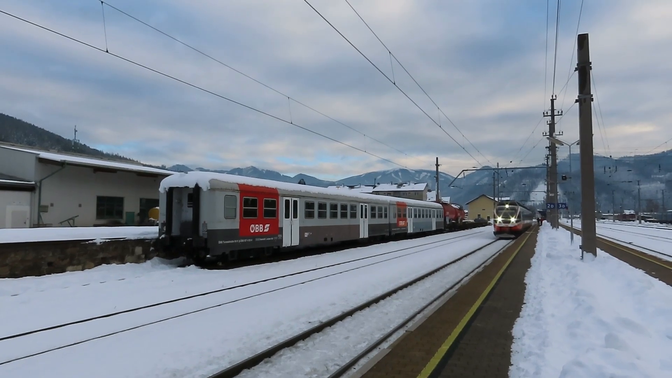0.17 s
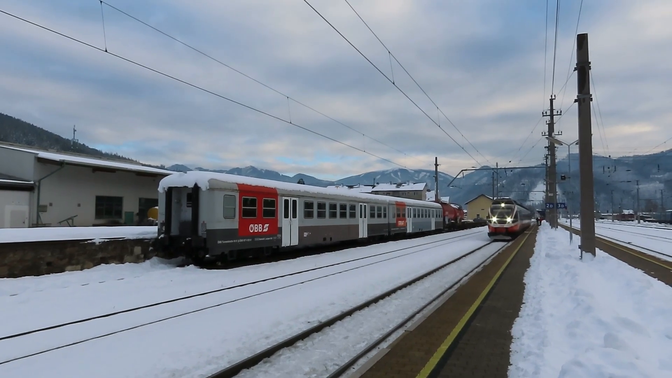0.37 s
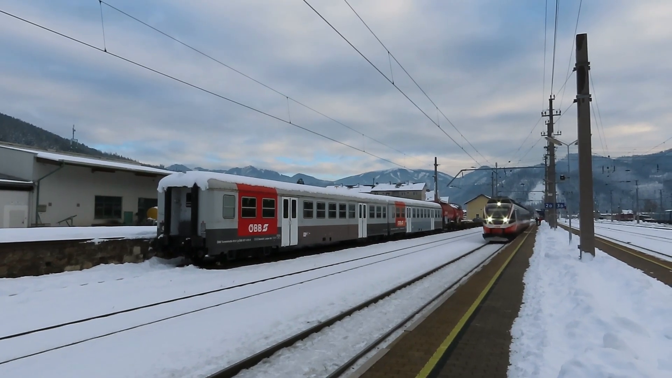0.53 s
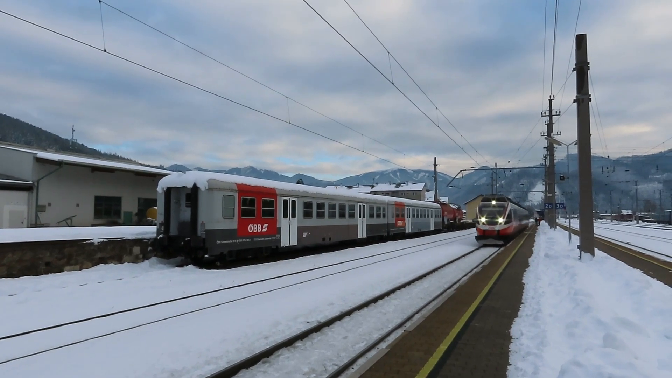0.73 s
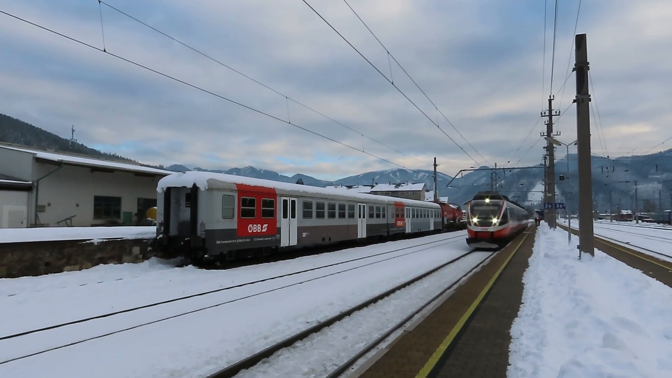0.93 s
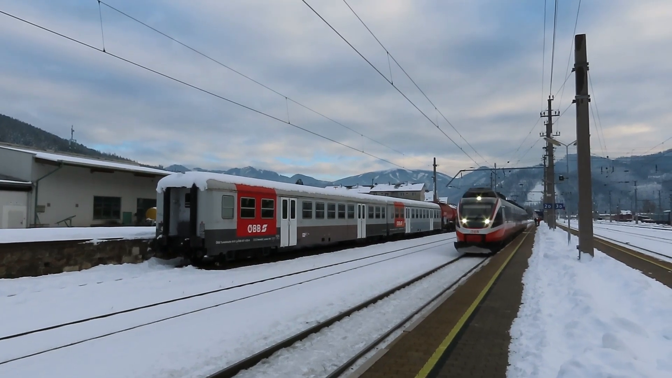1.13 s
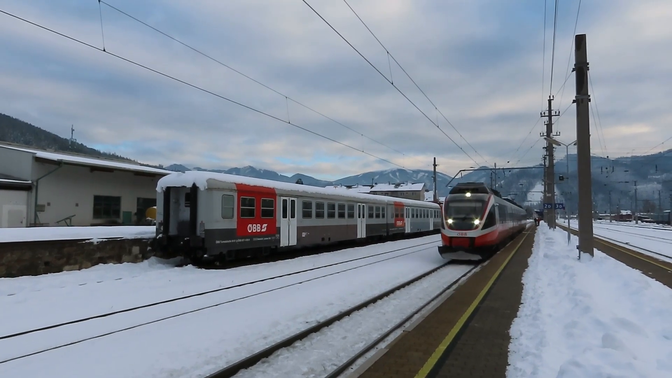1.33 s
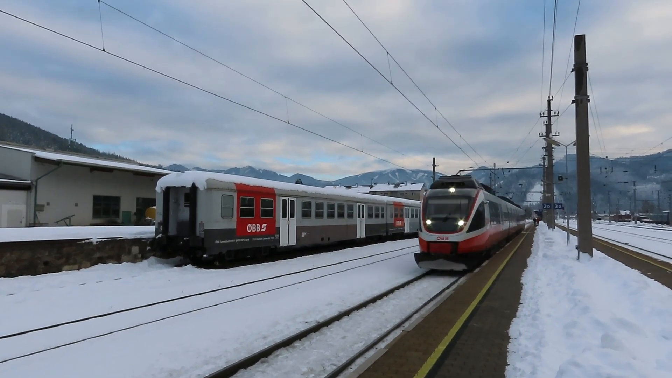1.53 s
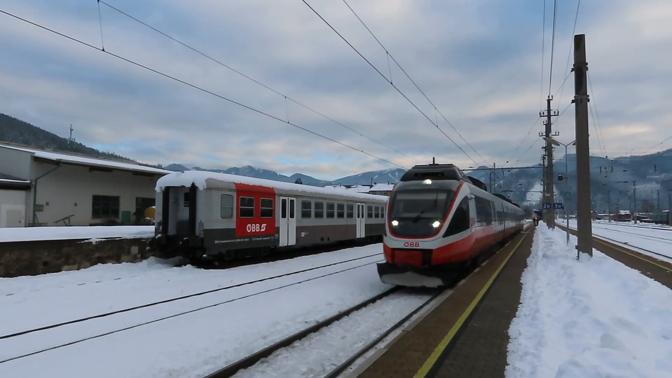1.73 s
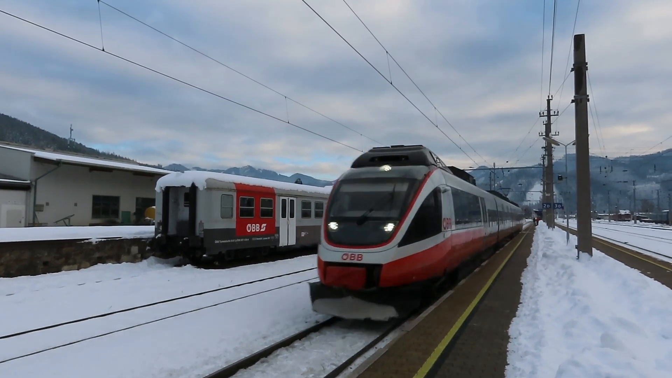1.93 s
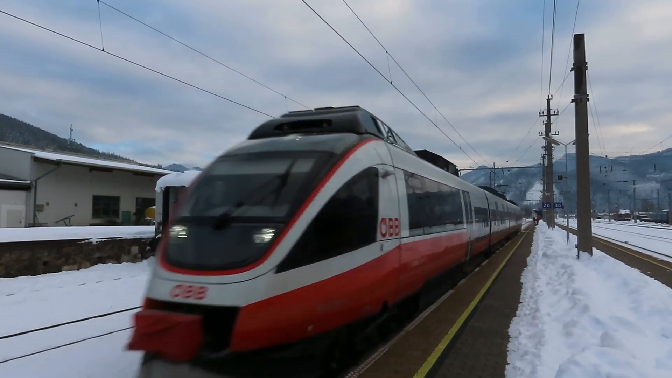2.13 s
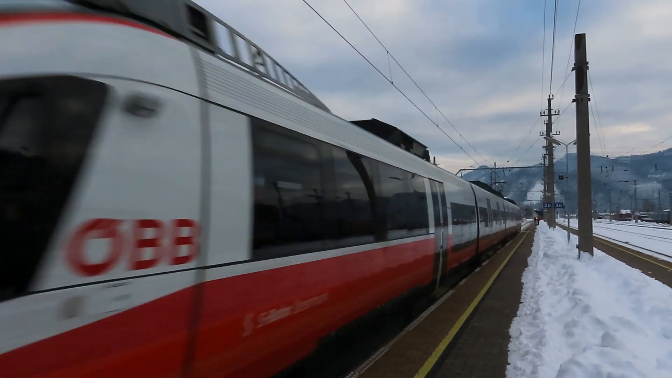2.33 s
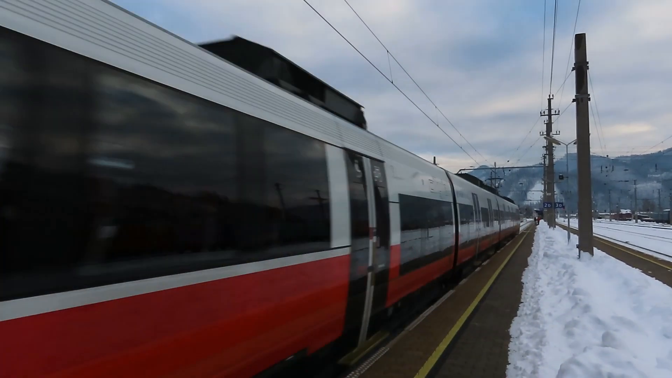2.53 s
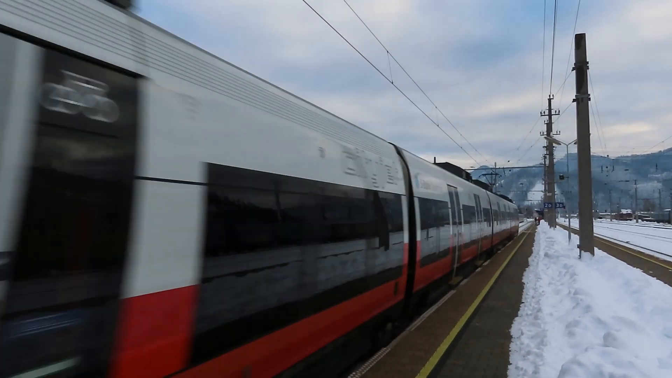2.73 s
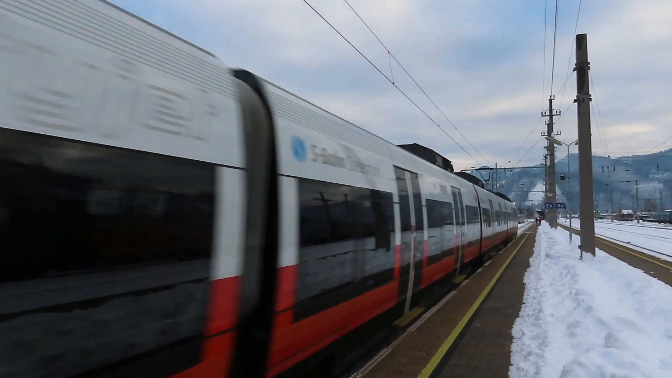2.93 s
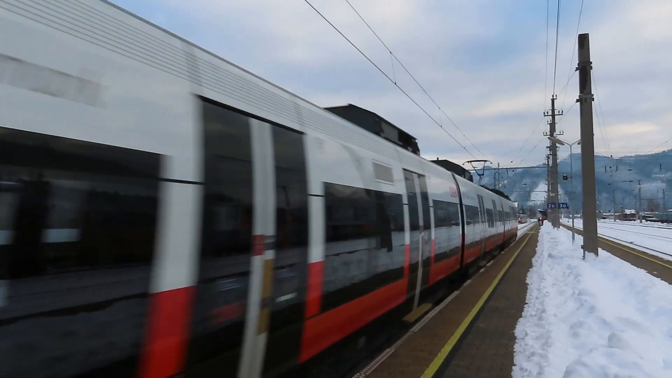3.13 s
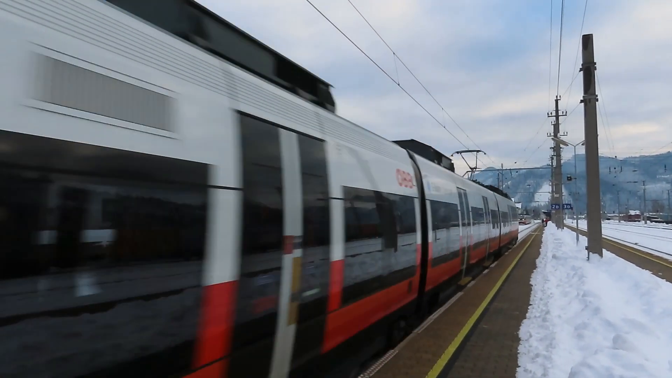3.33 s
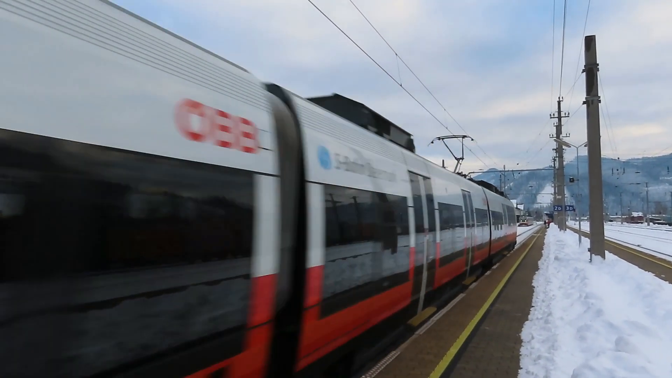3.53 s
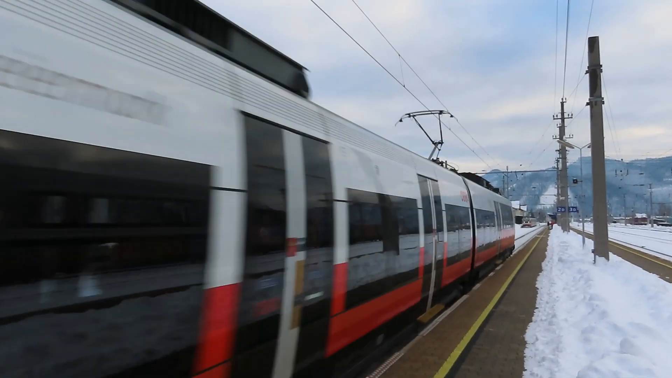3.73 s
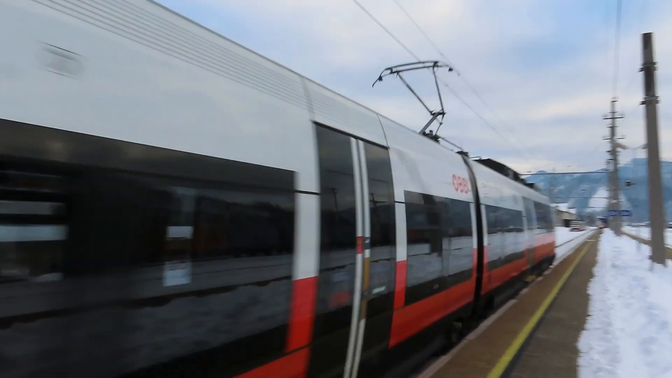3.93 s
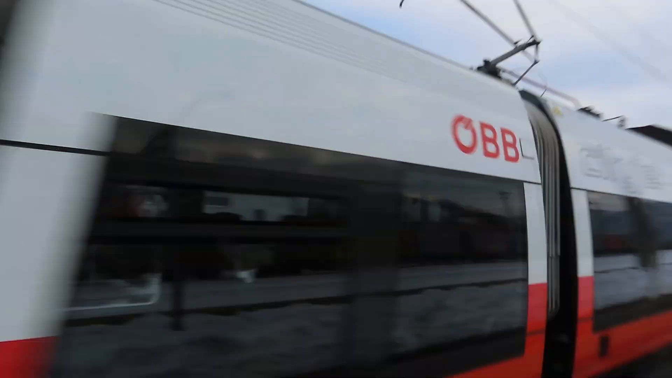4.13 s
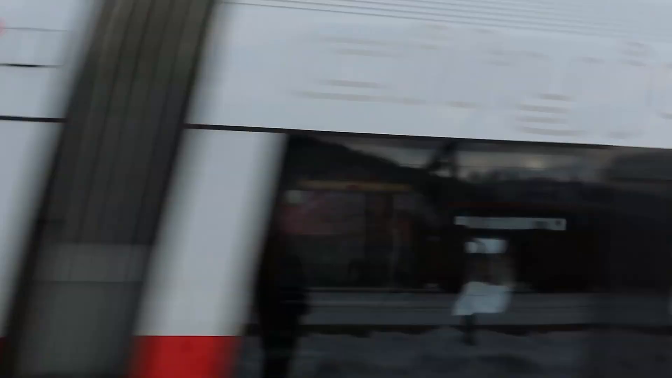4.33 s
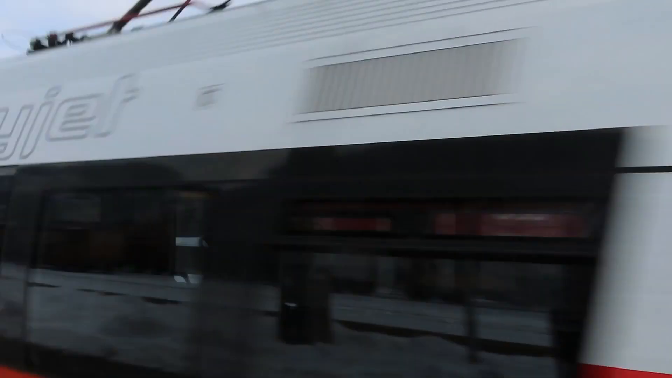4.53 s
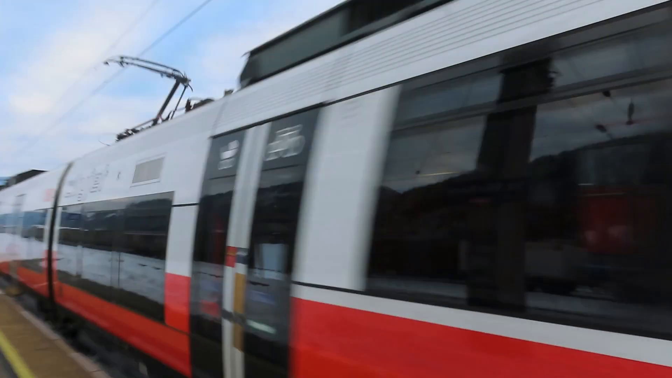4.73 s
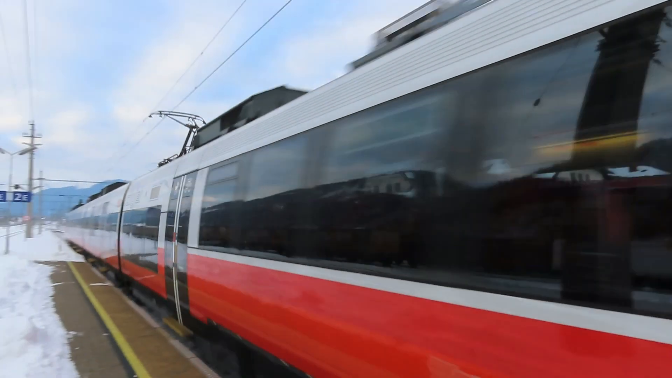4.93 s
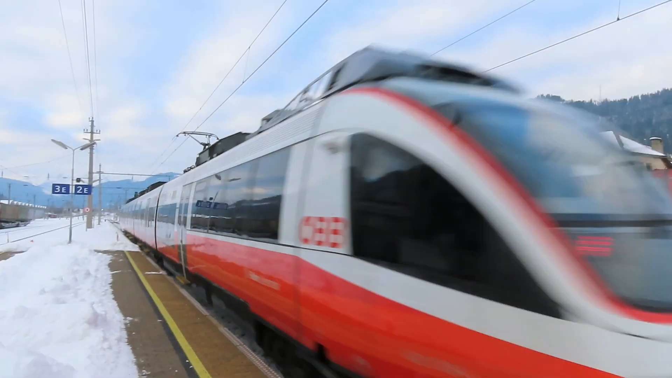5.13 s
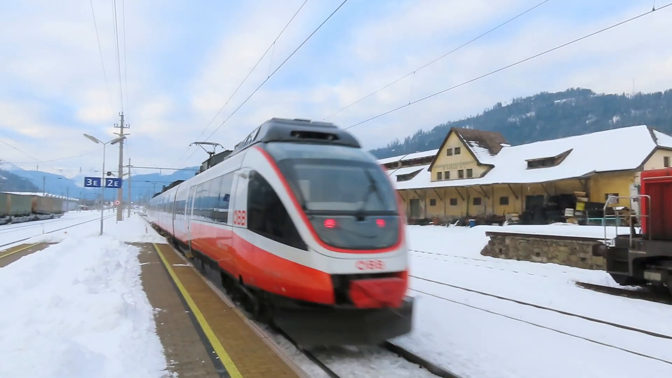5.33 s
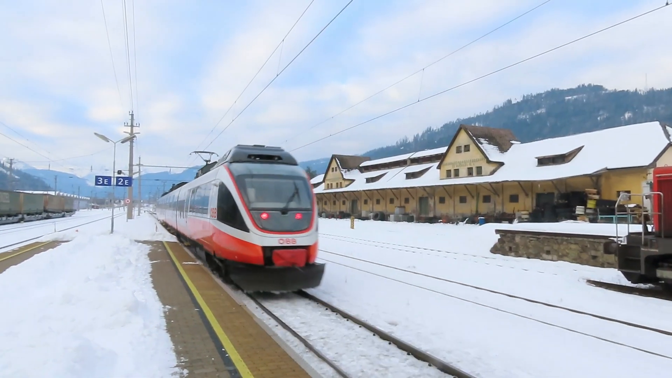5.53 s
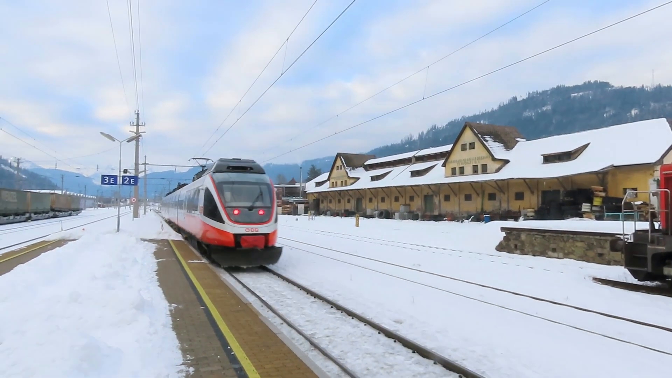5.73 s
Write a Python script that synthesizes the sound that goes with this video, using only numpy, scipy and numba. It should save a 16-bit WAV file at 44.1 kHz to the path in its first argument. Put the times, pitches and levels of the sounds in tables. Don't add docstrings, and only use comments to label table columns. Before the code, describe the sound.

Hand-held camera, outdoors, about a metre from the track: an electric train approaches with rolling rumble, mid-pitched whine and growing hiss. Its nose arrives with a sudden roar and low wind thump, the whine dropping in pitch. Several wheel sets pound by with hard metallic knocks and rail clank, dipping between groups, then the train recedes into fading rumble and a faint pure tone.

```python
import sys
import numpy as np
from scipy import signal
from scipy.fft import rfft, irfft
from scipy.io import wavfile
from scipy.ndimage import uniform_filter1d, map_coordinates
from numba import njit

SR = 44100
rng = np.random.default_rng(int(sys.argv[2]) if len(sys.argv) > 2 else 0)


def level_to_linear(level):
    exponent = np.asarray(level, float) / 20
    return 10 ** exponent


def persist_wave(psi):
    counts = np.round(np.clip(psi, -1, 1) * 32767).astype(np.int16)
    wavfile.write(sys.argv[1], SR, np.atleast_2d(counts).T)


N = 258867


def curves(table):
    s, *columns = np.transpose(table)
    return [np.interp(np.arange(N) / SR, s, c) for c in columns]


def colour(x, spectrum):
    hz, db = np.transpose(spectrum)
    log_hz = np.log(np.maximum(np.arange(N // 2 + 1) * SR / N, 1))
    return irfft(rfft(x) * level_to_linear(np.interp(log_hz, np.log(hz), db)), N)


def noise(spectrum):
    x = colour(rng.standard_normal(N), spectrum)
    return x / x.std()


def walk(rate):
    hold = int(SR / rate)
    steps = np.repeat(rng.standard_normal(N // hold + 1), hold)
    return 1.77 * uniform_filter1d(uniform_filter1d(steps, hold), hold)[:N]


def swell(s, rise_s, fall_s):
    t = np.arange(N) / SR - s
    return -4.3 * (t / np.where(t < 0, rise_s, fall_s)) ** 2


def together(*db):
    return np.sqrt(sum(level_to_linear(d) ** 2 for d in db))


@njit
def svf(x, hz, width):
    y, b, l = np.empty(len(x)), 0., 0.
    for i in range(len(x)):
        g, k = np.tan(np.pi * hz[i] / SR), width[i] / hz[i]
        v = (b + g * (x[i] - l)) / (1 + g * (g + k))
        b, l, y[i] = 2 * v - b, l + 2 * g * v, k * v
    return y


def delayed(x, seconds):
    return map_coordinates(x, [np.arange(N) - seconds * SR], order=5, mode="nearest")


def ports(x, lead, shade):
    left = delayed(x, -lead / 2) * (1 + shade * lead)
    right = delayed(x, lead / 2) * (1 - shade * lead)
    return np.array([left, right])


# t/s, end (0 nose, 1 flank, 2 tail)
FACING = [(0, 0), (2.52, 0), (2.68, 1), (4.8, 1), (5.05, 2), (5.87, 2)]


def by_end(values):
    return np.interp(curves(FACING)[0], np.arange(3), values)


def turning(spectra):
    facing = curves(FACING)[0]
    shares = [np.sqrt(np.clip(1 - np.abs(facing - k), 0, 1)) for k in range(3)]
    return sum(share * noise(s) for share, s in zip(shares, spectra))


# t/s, level/dB
NOSE = [(0, -15), (.6, -13), (1.0, -10), (1.25, -7.5), (1.7, -6), (2.1, -2.5), (2.28, 0), (2.38, 0),
        (2.45, -2), (2.53, 0.5), (2.62, -1.5), (2.72, -6), (2.9, -16.5), (3.3, -31), (5.87, -43)]
# t/s, level/dB, treble loss/dB, half width/s, frame pitch f/Hz
BOGIES = [(3.04, -3.5, 1.2, 0.13, 348), (3.22, 0, -3.2, 0.11, 490), (3.792, -2, -2.5, 0.11, 398),
          (3.96, -4.5, -3, .08, 335), (4.31, -4.5, -3, 0.11, 341), (4.53, -5.5, -1.5, 0.15, 370),
          (4.76, -11, -4, .08, 300)]
PARTS = {"frame": (-14, 1.18, -13.5, 0, -28.5), "ground": (-19.5, 1.27, -40, .5, -39),
         "rail": (-18, 1.0, -27, 0.42, -34.5), "wheel": (-21, 1.0, -31, 2, -38),
         "spray": (-38, 0.98, -47.5, 1.75, -50.5), "hiss": (-69, 0.5, -63, 1, -70)}
TAIL_FADE = {"frame": 7.5, "ground": -1.5, "rail": 7, "wheel": 11.5, "spray": 8, "hiss": 0}


def passing(part):
    nose_db, swing, flank_db, share, tail_db = PARTS[part]
    t = np.arange(N) / SR
    bogies = []
    for s, db, loss_db, half, _ in BOGIES:
        spread_db = 20 * np.log10(1 + ((t - s) / (1.83 * half)) ** 2)
        bogies.append(flank_db + db + share * loss_db - spread_db)
    tail_s, rise_s, hold_s = 5.05, .14, .12
    tail = tail_db + swell(tail_s, rise_s, np.inf)
    tail = tail - TAIL_FADE[part] * np.maximum(t - tail_s - hold_s, 0)
    return together(nose_db + swing * curves(NOSE)[0], tail, *bogies)


# t/s, level/dB
JET = [(0, -94), (.7, -74), (.92, -65), (1.02, -57), (1.09, -51), (1.75, -48.5), (2.1, -45), (2.27, -36.5),
       (2.4, -38.5), (2.46, -37), (2.52, -32), (2.6, -38), (2.7, -44), (2.8, -47.5), (2.92, -59),
       (3.3, -87), (5.87, -95.5)]


def with_jet(db, swing):
    jet_db = curves(JET)[0]
    return db + swing * (jet_db + 45.5) + np.minimum(jet_db + 58, 0)


# f/Hz, level/dB
GROUND = [
    [(12, -27), (30, -9.5), (54, 2), (85, -6.5), (115, -3.5), (150, -4), (250, -68.5)],
    [(15, -51), (25, -28), (54, -13.5), (85, -11.5), (115, -3), (150, -5), (250, -74)],
    [(15, -46), (25, -17), (54, -8), (85, -6.5), (130, 2), (170, -14), (250, -65.5)],
]
# f/Hz, level/dB
BOGIE = [(40, -51), (75, -15.5), (112, -3.5), (185, -1), (220, 2.5), (360, -0.5), (525, 0), (650, -8),
         (900, -37), (1400, -68)]
BOGIE_NOSE = [(40, -60), (75, -33), (112, -24), (170, -3.5), (240, -0.5), (380, -3.5), (525, -4), (650, -4),
              (900, -30.5), (1400, -60)]
# f/Hz, level/dB
RAIL = [(400, -53), (600, 0), (740, -0.5), (860, -4.5), (950, -4.5), (1100, -6.5), (1300, -19.5),
        (1800, -68)]
RAIL_NOSE = [(400, -36.5), (600, -5), (740, -4.5), (800, -0.5), (900, -0.5), (950, -6.5), (1100, -12.5),
             (1300, -38), (1800, -64.5)]
# f/Hz, level/dB
WHEEL = [
    [(700, -40), (1100, 1), (1400, -1), (1800, -1.5), (2200, -10), (2800, -6.5), (3200, -17), (4500, -55.5)],
    [(700, -34.5), (1100, -1.5), (1400, -3.5), (1800, -5), (2200, -12), (2800, -16), (3200, -40.5), (4500, -60)],
    [(700, -52), (1100, 2), (1600, 3.5), (1950, -8), (2320, -4), (2750, -14), (3200, -30), (4500, -59)],
]
# f/Hz, level/dB
SPRAY = [
    [(2000, -45), (2900, -3.5), (3800, -0.5), (4500, -3), (5200, -5.5), (6300, -14.5), (7500, -11.5), (9000, -48.5)],
    [(2000, -53.5), (2900, -1.5), (3800, -1.5), (4500, -5), (5200, -7.5), (6300, -13.5), (7500, -17.5), (9000, -43.5)],
    [(2000, -44), (2900, 3), (3800, 0), (4400, -4.5), (5200, -12), (6300, -13), (7500, -19.5), (9000, -48)],
]
# f/Hz, level/dB
HISS = [
    [(4500, -20), (6300, -1), (8000, 0.5), (10500, 0), (12500, -2.5), (14000, -4), (15600, -8.5), (15900, -52.5)],
    [(4500, -46), (6300, -4), (8000, -0.5), (10500, -7), (12500, -12), (14000, -14), (15000, -22), (15900, -65)],
    [(4500, -45), (6300, -6), (8000, -1), (10000, -3), (11500, -12), (13000, -12), (15000, -29), (15900, -62)],
]
# t/s, level/dB, length/s
JOINTS = [(0.65, -39, 0.042), (1.01, -32.5, 0.04), (1.765, -24.5, 0.1), (3.08, -26.5, .07),
          (3.608, -32.5, 0.086), (4.804, -32.5, .07), (5.38, -41.5, 0.04), (5.782, -35.5, .08)]
# t/s, dip/dB, half length/s
LULLS = [(3.085, -6, .012), (3.27, -2, .015), (3.81, -3, .01), (3.895, -4, .012), (4.0, -4, .02),
         (4.17, -1.5, .012), (4.235, -3, .012), (4.268, -5, .01), (4.33, -5, .012), (4.365, -3, .008),
         (4.512, -5, .012), (4.655, -3, .015), (4.835, -3, .01)]
# t/s, level/dB, rise/s, fall/s
SURGE = (2.58, -37.5, .08, .045)


def train():
    tremble = walk(11)
    thumps = together(*[db + swell(s, length, length) for s, db, length in JOINTS])
    ground = level_to_linear(.89 * walk(8.6)) * np.hypot(passing("ground"), thumps) * turning(GROUND)
    frame_hz, ends_hz = 312, 398
    bogie_hz = by_end((ends_hz, frame_hz, ends_hz))
    bogie_hz = bogie_hz + sum((hz - frame_hz) * level_to_linear(swell(s, half, half / 2)) for s, _, _, half, hz in BOGIES)
    frame = turning((BOGIE_NOSE, BOGIE, BOGIE))
    frame = frame + .96 * svf(frame, bogie_hz, bogie_hz * .54)
    lulls_db = sum(db * level_to_linear(swell(s, half, half)) for s, db, half in LULLS)
    frame = level_to_linear(-4.5 + .55 * tremble + lulls_db) * passing("frame") * frame
    rail = level_to_linear(.86 * tremble) * passing("rail") * turning((RAIL_NOSE, RAIL, RAIL))
    wheel = level_to_linear(.64 * tremble) * passing("wheel") * turning(WHEEL)
    surge_s, surge_db, rise, fall = SURGE
    blown = together(with_jet(-47, .39), surge_db + swell(surge_s, rise, fall))
    spray = level_to_linear(.5 * tremble) * np.hypot(passing("spray"), blown) * turning(SPRAY)
    hiss_gain = np.hypot(passing("hiss"), level_to_linear(curves(JET)[0]))
    hiss = level_to_linear(by_end((.5, 3, 1.5)) * walk(14)) * hiss_gain * turning(HISS)
    return ground + frame + rail, wheel + spray + hiss


# t/s, extra path/ms, share 0-1
MIRROR = [(0, .51, .4), (1.1, .508, .5), (2.0, .508, .42), (2.3, .53, .25), (2.5, .7, .1), (4.9, .6, .1),
          (5.1, .39, .2), (5.4, .44, .15), (5.87, .44, .15)]


def mirrored(high):
    path_ms, share = curves(MIRROR)
    share = np.clip(share, 0, .9)
    return (high + share * delayed(high, path_ms / 1000)) / np.sqrt(1 + share ** 2)


# f/Hz, level/dB
SCATTER = [(60, -65.5), (250, -40.5), (500, -23), (1000, -15.5), (2000, -11), (4000, -9), (7000, -5),
           (10000, 0.5), (15000, 5)]
SCATTER_DB = (-10.5, -8, -8.5)


def scatter():
    return level_to_linear(by_end(SCATTER_DB) + 3.5) * colour(sum(train()), SCATTER)


# f/Hz, level/dB
SIZZLE = [(9000, -40), (10800, -9), (11700, -7), (12200, -1), (12800, 0), (13500, -3), (14000, -10),
          (15000, -8), (15600, -9), (15900, -50)]


def sizzle():
    steady_db = by_end((-62, -80.5, -82)) + .6 * np.clip(curves(NOSE)[0] + 13, -3, 3)
    return together(steady_db, with_jet(-55.5, .15)) * noise(SIZZLE)


def whine():
    t = np.arange(N) / SR
    pass_s = 2.52
    ahead = pass_s - t
    hz = 798 * (1 + .05 * np.tanh(ahead / .06)) + 13 * ahead
    db = -33 + 1.1 * curves(NOSE)[0] + 2 * walk(7)
    db = db - 3.5 * level_to_linear(swell(1.52, .15, .15))
    db = db - 18.5 * level_to_linear(swell(pass_s, .03, .044))
    db = db - 60 * np.maximum(-ahead - .1, 0)
    blur_hz = 11 + 35 * np.clip(ahead - .4, 0, 1.3)
    band = svf(rng.standard_normal(N), hz, blur_hz) * np.sqrt(SR / np.pi / blur_hz)
    tail_s = 5.36
    tail_hz = 733 + 64 * (t - tail_s)
    tone_db = -35.5 + swell(tail_s + .13, .12, np.inf)
    tone = np.sin(2 * np.pi * np.cumsum(tail_hz + .6 * walk(15)) / SR)
    return level_to_linear(db) * band + np.sqrt(2) * level_to_linear(tone_db + walk(22)) * tone


# f/Hz, level/dB
RUSTLE = [(20, -30), (80, -12), (200, -5.5), (400, 3), (700, -5.5), (1500, -47.5)]


def breeze():
    return level_to_linear(-52 + swell(2.15, np.inf, .06) + 3.4 * walk(9)) * noise(RUSTLE)


def thin_tones(table, wobble):
    t = np.arange(N) / SR
    out = np.zeros(N)
    for s, hz, db, length in table:
        gain = level_to_linear(db + swell(s, length, length) + 2 * walk(30))
        out += gain * np.sin(2 * np.pi * hz * t + wobble * walk(40))
    return out


# t/s, f/Hz, level/dB, length/s
FLARES = [(.4, 885, -35, .05), (.92, 840, -33, .03), (1.27, 845, -31, .06), (1.62, 905, -31, .05),
          (1.92, 790, -29, .04), (1.98, 865, -30, .04), (2.24, 841, -21.5, .06), (2.27, 785, -24, .025),
          (2.415, 855, -22, .025), (2.61, 762, -19.5, .03), (5.14, 756, -36, .04)]


def flares():
    return thin_tones(FLARES, .24)


# t/s, f/Hz, level/dB, half length/s
RINGS = [(2.209, 322, -19.0, 0.008), (2.295, 258, -16.0, 0.008), (2.317, 419, -17.0, 0.008),
         (2.358, 355, -18.0, 0.012), (2.426, 183, -15.0, 0.008), (2.508, 430, -18.0, 0.013),
         (2.517, 538, -18.0, 0.01), (2.971, 247, -18.0, 0.01), (3.039, 269, -16.0, 0.015),
         (3.066, 419, -15.0, 0.008), (3.07, 549, -17.0, 0.008), (3.098, 161, -19.0, 0.01),
         (3.125, 344, -18.0, 0.01), (3.134, 516, -15.0, 0.027), (3.136, 204, -19.0, 0.008),
         (3.175, 559, -14.0, 0.016), (3.184, 355, -13.0, 0.011), (3.202, 592, -15.0, 0.021),
         (3.22, 495, -11.0, 0.008), (3.227, 290, -19.0, 0.008), (3.24, 226, -18.0, 0.019),
         (3.317, 473, -18.0, 0.008), (3.331, 215, -15.0, 0.012), (3.764, 355, -14.0, 0.008),
         (3.78, 495, -16.0, 0.013), (3.787, 409, -12.0, 0.008), (3.828, 462, -16.0, 0.008),
         (3.853, 333, -16.0, 0.01), (3.878, 484, -18.0, 0.011), (3.916, 409, -19.0, 0.016),
         (3.934, 193, -19.0, 0.021), (3.959, 290, -16.0, 0.016), (4.032, 322, -19.0, 0.021),
         (4.059, 269, -19.0, 0.015), (4.206, 387, -16.0, 0.008), (4.209, 301, -15.0, 0.008),
         (4.252, 366, -18.0, 0.019), (4.283, 538, -19.0, 0.008), (4.299, 301, -15.0, 0.013),
         (4.299, 387, -18.0, 0.01), (4.311, 236, -17.0, 0.018), (4.345, 355, -19.0, 0.014),
         (4.379, 236, -17.0, 0.008), (4.392, 290, -17.0, 0.008), (4.392, 376, -17.0, 0.01),
         (4.456, 355, -18.0, 0.03), (4.472, 581, -18.0, 0.008), (4.535, 355, -16.0, 0.008)]


def rings():
    out = np.zeros(N)
    for (s, hz, db, half), turn in zip(RINGS, rng.random(len(RINGS))):
        i = np.arange(-4000, 4000) + int(s * SR)
        t = i / SR - s
        tone = np.sin(2 * np.pi * (hz * t * (1 - .3 * t) + turn))
        out[i] += level_to_linear(db + 1.5 - 4.3 * (t / half) ** 2) * tone
    return out


# t/s, level/dB, rise/s, fall/s
GUSTS = [
    (2.28, -27, 0.045, .05),
    (2.42, -17.5, 0.066, 0.036),
    (2.57, -25, .04, 0.02),
    (2.73, -46, .04, .03),
    (5.2, -44, .035, 0.034),
    (5.35, -52, .04, .035),
]
# f/Hz, level/dB
BUFFET = [(12, -49), (25, -36), (82, -4), (204, -6), (334, -15), (480, -19.5), (700, -40), (1500, -87)]


def buffets():
    gusts = together(*[db + swell(s, rise, fall) for s, db, rise, fall in GUSTS])
    return gusts * level_to_linear(2.5 * walk(25)) * noise(BUFFET)


# t/s, peak level/dB, pitch f/Hz, rail clank level/dB
KNOCKS = [(2.293, -4, 263, -8), (2.352, -11.5, 345, -20.5), (2.42, -4.5, 205, -23.5),
          (2.509, -7.5, 533, -11), (2.617, -10.5, 353, -10.5), (2.977, -15.5, 267, -33),
          (3.062, -5.5, 550, -23.5), (3.125, 1.5, 530, -14), (3.198, 4, 527, -13), (3.292, -13.5, 504, -15),
          (3.325, 0, 212, -14), (3.41, -15, 260, -21), (3.773, 2, 413, -34), (3.869, -9.5, 474, -20.5),
          (3.959, -5.5, 275, -24.5), (4.131, -10, 255, -28), (4.205, 4.5, 320, -23),
          (4.293, -0.5, 312, -19.5), (4.387, -4, 300, -16), (4.482, -0.5, 353, -18), (4.563, -9, 282, -21),
          (4.683, -13, 336, -27), (4.78, -12, 308, -29), (4.852, -12.5, 202, -35.5),
          (5.235, -20, 207, -31.5), (5.341, -17.5, 312, -33)]
KNOCK_RING_DB = (-11, -19, -10)


def knocks():
    out, shake = np.zeros(N), noise(BOGIE)
    clank = noise(RAIL) + level_to_linear(-12) * noise(WHEEL[1])
    ring_gain = level_to_linear(by_end(KNOCK_RING_DB))
    for s, db, hz, clank_db in KNOCKS:
        t = np.arange(N) / SR - s
        near = np.abs(t) < .1
        push = np.exp(-.5 * (t[near] / np.where(t[near] < 0, .012, .02)) ** 2)
        ring = svf(shake[near], np.full(near.sum(), 1. * hz), np.full(near.sum(), 170.))
        frame = level_to_linear(db) * ring_gain[near] * ring / ring.std()
        out[near] += push * (frame + level_to_linear(clank_db - 6) * push * clank[near])
    return out


# t/s, peak level/dB, f/Hz, length/ms
BLOWS = [(2.935, -7.5, 330, 3.8), (2.97, -8, 276, 9.8), (2.979, -9, 349, 2.5), (3.042, -8.5, 337, 6.9),
         (3.054, -4.5, 312, 3.7), (3.064, -4, 455, 3.9), (3.071, -5.5, 462, 3.4), (3.098, -8, 320, 5.4),
         (3.113, -12, 388, 4.8), (3.134, -8.5, 450, 10.1), (3.154, -5.5, 445, 4.7), (3.171, -6, 462, 3.6),
         (3.181, 2.5, 486, 5.2), (3.188, -7, 408, 5.9), (3.207, -7, 510, 4.4), (3.219, -3, 490, 11.6),
         (3.253, -8, 432, 2.4), (3.298, -11.5, 449, 5.5), (3.333, -13, 285, 13), (3.412, -13.5, 361, 9.8),
         (3.517, -10, 398, 3.5), (3.737, -10.5, 404, 5.1), (3.766, -3.5, 340, 7), (3.786, -3, 422, 6.5),
         (3.795, -9, 473, 4.3), (3.829, -5.5, 476, 6.6), (3.85, -5, 366, 6.5), (3.86, -6, 350, 5.1),
         (3.874, -11.5, 425, 6.4), (3.921, -6, 410, 6.8), (3.939, -4, 290, 4.9), (3.958, -6, 299, 7.1),
         (3.978, -9.5, 332, 9), (4.037, -9.5, 329, 6.1), (4.053, -12.5, 335, 6.7), (4.201, -5.5, 329, 6.4),
         (4.212, -6, 331, 4.9), (4.282, -5.5, 418, 3.9), (4.294, -2, 300, 5.2), (4.304, -2, 320, 5.6),
         (4.341, -7, 391, 4.9), (4.385, -6, 330, 4), (4.396, -6, 366, 9.7), (4.479, -9, 438, 6.9),
         (4.493, -5.5, 373, 4.6), (4.533, -8.5, 349, 8), (4.541, -9, 351, 3.9), (4.588, -8.5, 316, 4.1),
         (4.621, -9, 355, 5.3), (4.785, -12.5, 300, 9.9)]


def blows():
    out = np.zeros(N)
    for (s, db, hz, ms), turn in zip(BLOWS, rng.random((len(BLOWS), 2))):
        i = np.arange(-900, 1300) + int(s * SR)
        t = i / SR - s
        push = np.exp(-.5 * (1000 * t / ms / np.where(t < 0, .33, .6)) ** 2)
        body = np.sin(2 * np.pi * (hz * t + turn[0]))
        edge = level_to_linear(-17) * push * np.sin(2 * np.pi * (2.15 * hz * t + turn[1]))
        out[i] += level_to_linear(min(db - 2, -5.5)) * push * (body + edge)
    return out


# t/s, level/dB, rise/s, fall/s
PUFFS = [(3.04, -59, .08, .08), (3.815, -63, .01, .05), (4.29, -63.5, .015, .05), (5.03, -69, .1, .1)]
# f/Hz, level/dB
PUFF = [(5000, -30), (6300, -6), (7500, 0), (8500, -3), (10000, -11), (12500, -17), (14500, -32)]


def puffs():
    return together(*[db + swell(s, rise, fall) for s, db, rise, fall in PUFFS]) * noise(PUFF)


# t/s, f/Hz, level/dB, length/s
SQUEALS = [(3.945, 3400, -50, .01), (4.18, 4320, -59, .025), (4.38, 3400, -54, .01), (5.0, 2550, -55, .15)]


def squeals():
    return thin_tones(SQUEALS, 1)


# t/s, lead of the left port/us
BEARING = [(0, -14.5), (.6, -15.5), (1.3, -1.5), (2.0, 12), (2.39, 15.5), (2.55, 46.5), (2.74, 58.5),
           (3.0, 14), (3.3, 57), (3.6, 27.5), (3.92, 48), (4.3, 13.5), (4.67, 23.5), (4.8, 19), (5.03, -50),
           (5.3, -5.5), (5.65, 13.5), (5.87, 6)]


def scene():
    low, high = train()
    high = mirrored(high)
    lead_us = curves(BEARING)[0]
    top_from_hz, limit_us = 11300, 58
    top = colour(high, [(.9 * top_from_hz, -60), (.95 * top_from_hz, -6), (top_from_hz, 0)])
    direct = ports(low + knocks() + whine() + blows(), lead_us / 2e6, shade=720)
    direct = direct + ports(high - top, lead_us / .99e6, shade=3800)
    direct = direct + ports(top, np.clip(lead_us, -limit_us, limit_us) / 1.46e6, shade=0)
    around = (scatter() + sizzle()) * np.array([[1], [-1]])
    wind = (buffets() + breeze()) * np.array([[.8], [-1.2]])
    small = ports(rings() + puffs(), lead_us / 1e6, shade=720)
    return level_to_linear(-.66) * direct + around + wind + squeals() + flares() + small


def top_cut(x):
    return signal.sosfilt(signal.butter(12, 15730, fs=SR, output="sos"), x)


def record(dry):
    mix = np.clip(1.302 * np.tanh(dry / 1.299), -1, 1)
    return top_cut(mix)


dry = scene()
out = record(dry)
persist_wave(out)
```